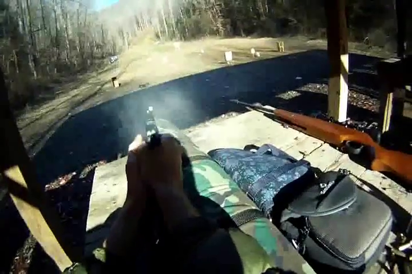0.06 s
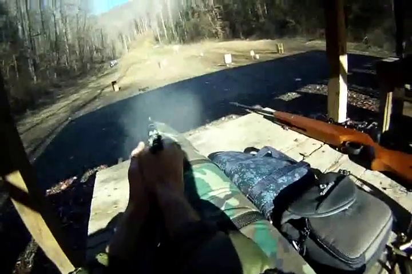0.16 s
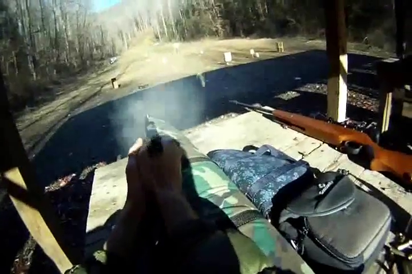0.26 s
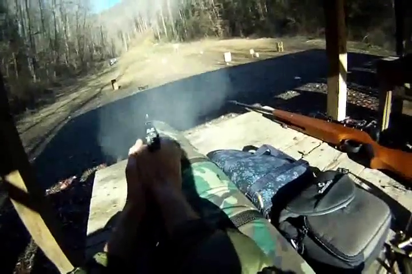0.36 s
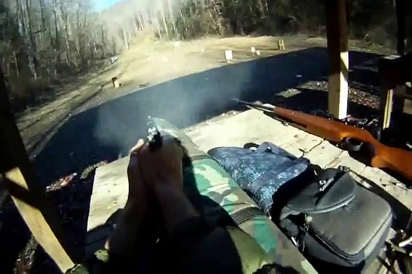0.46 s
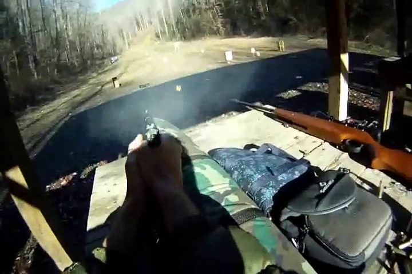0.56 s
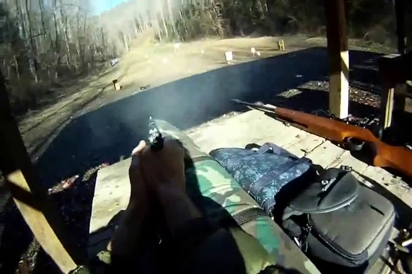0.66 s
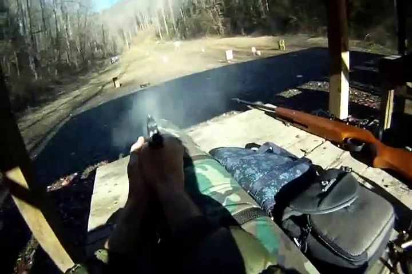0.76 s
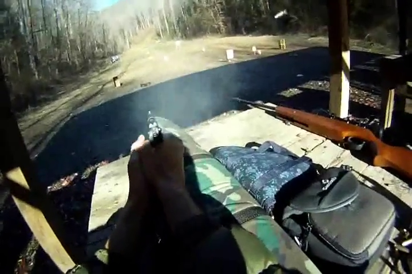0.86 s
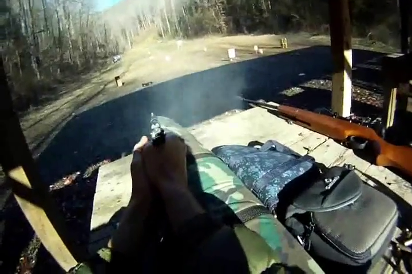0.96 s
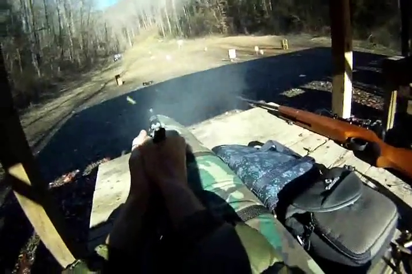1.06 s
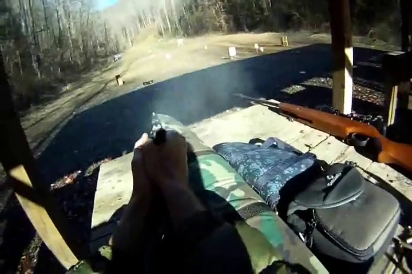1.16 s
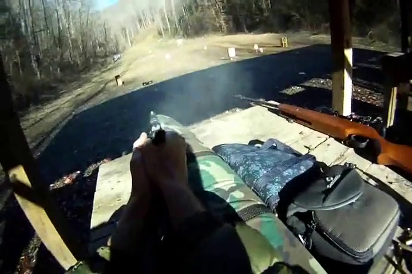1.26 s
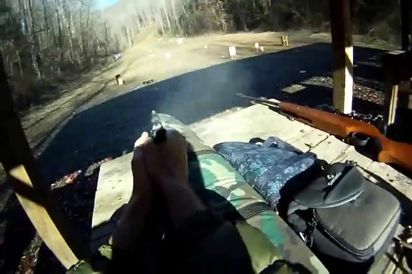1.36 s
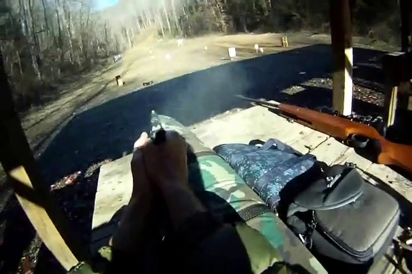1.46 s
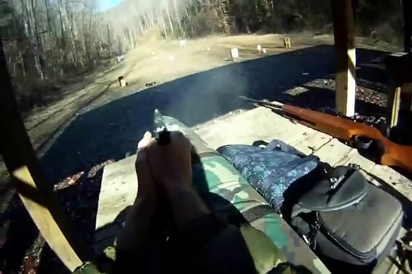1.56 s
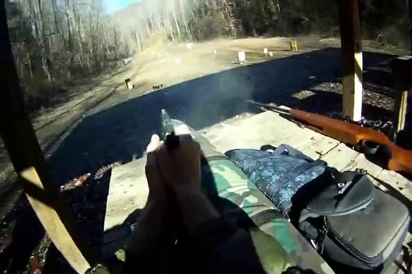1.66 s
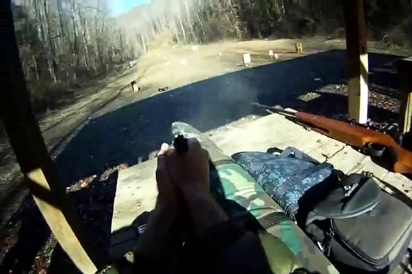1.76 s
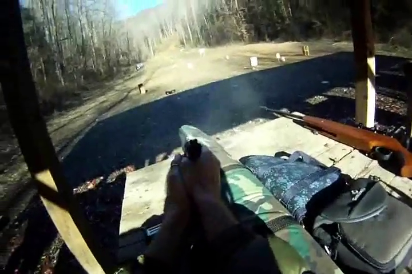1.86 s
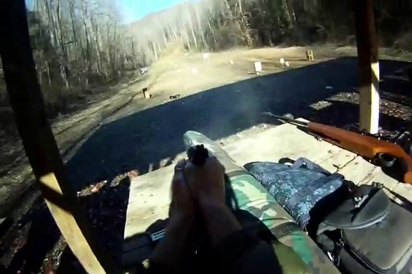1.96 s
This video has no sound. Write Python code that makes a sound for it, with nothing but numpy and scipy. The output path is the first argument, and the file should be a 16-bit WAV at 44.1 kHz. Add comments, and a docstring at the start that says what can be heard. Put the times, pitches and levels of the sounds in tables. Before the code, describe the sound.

Rapid pistol fire under a roofed outdoor range: earlier echoes already ringing, five overloaded cracks about four a second, hard slaps from roof and posts, then a long soft hillside echo. The microphone is very close.

```python
"""Two pistol shots fired before the start are still echoing, over faint wind, on a roofed outdoor range.
Five more follow, about four a second: hands rumble, the firing pin clicks, and the muzzle blast cracks.
Each blast excites the modes of a camera housing just behind the gun and overloads the camera; roof and
posts slap it back, and a wooded hillside returns a long, soft echo from diffuse scattering.
Inside the last echo come two dull, distant thuds, made of coloured noise with exponential decays."""
import sys
import numpy as np
from scipy import signal
from scipy.fft import rfft, irfft, next_fast_len
from scipy.io import wavfile
from scipy.ndimage import map_coordinates

SR = 44100
rng = np.random.default_rng(int(sys.argv[2]) if len(sys.argv) > 2 else 0)


def wav_record(signal):
    """Record a signal, one row per channel, as 16-bit PCM in the file named by sys.argv[1]."""
    frames = np.transpose(np.atleast_2d(signal))
    bounded = np.clip(frames, -1, 1)
    # unit amplitude maps onto the largest positive 16-bit level
    quanta = np.round(bounded * 32767).astype(np.int16)
    wavfile.write(sys.argv[1], SR, quanta)


N = 88200
ALIKE = 0.78  # share of the noise power that is common to all shots


def amp(db):
    """Decibels to an amplitude ratio."""
    return 10 ** (np.asarray(db) / 20)


def unit(x):
    """Normalisation to an rms of 1."""
    return x / np.sqrt(np.mean(x ** 2) + 1e-20)


def along(points, hz):
    """Spectral envelope: (Hz, value) points joined by lines on a log frequency axis."""
    corner_hz, value = np.transpose(points)
    return np.interp(np.log(hz + 1), np.log(corner_hz + 1), value)


def filtered(x, response):
    """Linear filtering: the spectrum of x times a complex response of frequency."""
    size = next_fast_len(N + SR // 2)
    spectrum = rfft(x, size) * response(np.fft.rfftfreq(size, 1 / SR))
    return irfft(spectrum, size)[..., :N]


def coloured(x, points):
    """Filtering of x by a spectral envelope in dB."""
    return filtered(x, lambda hz: amp(along(points, hz)))


def delayed(x, seconds):
    """Propagation delay: x moved later, or earlier if negative."""
    samples = round(seconds * SR)
    padded = np.pad(x, (max(samples, 0), N))
    return padded[max(-samples, 0):][:N]


def decay(t60, hold=0):
    """Exponential decay after a hold, falling 60 dB in t60 seconds."""
    falling_s = np.maximum(np.arange(N) / SR - hold, 0)
    return amp(-60 * falling_s / t60)


def swing(hz, db, centre, width):
    """Pressure pulse: a sine under a Gaussian envelope."""
    t = np.arange(N) / SR - centre
    return amp(db) * np.sin(2 * np.pi * hz * t) * np.exp(-(t / width) ** 2 / 2)


def paths():
    """Partial coherence: one white noise for each shot, mostly common to all."""
    common = rng.standard_normal(N)
    own = rng.standard_normal((len(SHOTS), N))
    return np.sqrt(ALIKE) * common + np.sqrt(1 - ALIKE) * own


def scatter(spectrum):
    """Diffuse reflection: dense noise of rms 1 with the given colour, for each shot."""
    return unit(coloured(paths(), spectrum))


def burst(t60, hold=0, size=2048, count=4):
    """Impulsive turbulence: a short noise of unit energy and nearly even spectrum for each shot."""
    shape = decay(t60, hold)[:size]
    x = paths()[:, :size] * shape
    for _ in range(count):
        # keep only the phases, then gather the flat-spectrum sound towards its start again
        flat = irfft(np.exp(1j * np.angle(rfft(x))))
        x = flat * np.sqrt(shape)
    x = x / np.linalg.norm(x, axis=1, keepdims=True)
    return np.pad(x, ((0, 0), (0, N - size)))


# Colour of the moving air. Each row: frequency in Hz, level in dB.
WIND_COLOUR = [(25, -5), (55, 4), (90, -14), (135, -11), (220, -9), (1500, -14.5), (5000, -57),
               (16000, -61.5)]
WIND_DB = -59


def wind():
    """Stationary coloured noise: faint air moving over the range."""
    return amp(WIND_DB) * unit(coloured(rng.standard_normal(N), WIND_COLOUR))


# Faint knocks far down the range. Each row: start in seconds, level in dB.
THUDS = [(1.451, -40), (1.472, -37.5)]
# Their dull colour. Each row: frequency in Hz, level in dB.
THUD_COLOUR = [(60, -6), (200, -16), (330, 1), (700, -4), (1500, -5), (4000, -27), (16000, -48)]
THUD_T60_S = 0.063


def thuds():
    """Impulsive excitation with exponential decay: dull, distant knocks inside the last echo."""
    level = sum(amp(db) * delayed(decay(THUD_T60_S), start) for start, db in THUDS)
    return level * unit(coloured(rng.standard_normal(N), THUD_COLOUR))


# Colour of the wooded slope. Each row: frequency in Hz, level in dB.
HILL_COLOUR = [(30, -10), (60, -14), (100, -18.5), (200, -18), (340, -17.5), (620, -11.5), (950, -8.5),
               (1200, -5.5), (1600, -4.5), (2350, 2), (2800, -11.5), (3050, -8.5), (3700, -6),
               (4200, -20.5), (5200, -18.5), (6000, -29.5), (7000, -19.5), (9800, -8.5), (12000, -23),
               (14300, -18), (16000, -23)]
# Swell and fall of its echo. Each row: delay after the shot in seconds, level in dB.
ECHO = [(.08, -61), (.13, -40.5), (.165, -33), (0.187, -33.5), (0.206, -27.5), (.245, -34), (.29, -35),
        (.42, -42), (.56, -47), (.82, -53.5)]
# Extra fading after the crest of the echo. Each row: frequency in Hz, loss in dB per second.
FADE = [(60, -1), (400, -6), (1200, -1.5), (2300, -1), (3500, 8.5), (5000, 8.5), (7000, 17.5), (10000, -2),
        (15000, -1)]
ECHO_T60_S = 2.15  # decay after the last row of ECHO
CLUMP_DB, CLUMP_RATE_HZ = 1.69, 140  # spread of the level in dB, new random values per second


def hillside(size=256):
    """Scattering by trunks and banks: an echo that swells, clumps and fades unevenly over frequency."""
    t = np.arange(N) / SR
    delay_s, level_db = np.transpose(ECHO)
    crest_s = delay_s[np.argmax(level_db)]
    hz, frame_s, frames = signal.stft(scatter(HILL_COLOUR), SR, nperseg=size)
    loss_db = along(FADE, hz)[:, None] * np.maximum(frame_s - crest_s, 0)
    faded = signal.istft(frames * amp(-loss_db), SR, nperseg=size)[1][:, :N]
    clumps = map_coordinates(rng.standard_normal(N), [t * CLUMP_RATE_HZ])
    swell = amp(np.interp(t, delay_s, level_db) + CLUMP_DB * clumps)
    return faded * swell * decay(ECHO_T60_S, delay_s[-1])


# Colour of sound returned by roof and posts. Each row: frequency in Hz, level in dB.
SHELTER_COLOUR = [(60, -20.5), (100, -50), (135, -9), (190, -42), (285, -10.5), (380, -29), (600, -14.5),
                  (850, -12.5), (1250, -9), (1680, -6.5), (1830, 4.5), (2300, 3.5), (2420, -8),
                  (2620, -6.5), (2850, -2.5), (3100, -6.5), (3650, -2.5), (4100, -14.5), (5100, -11),
                  (6100, -22), (7000, -14.5), (10000, -6), (12000, -31), (14200, -11.5), (16000, -18.5)]
SHELTER_DB, SHELTER_T60_S = -15.5, 0.25  # slower part of the decay
FLUTTER_DB, FLUTTER_T60_S = 4, 0.066  # louder, faster part
SHELTER_BUILD_S = 0.009


def shelter():
    """Reverberation: dense reflections under the roof build up, then decay at two rates."""
    t = np.arange(N) / SR
    slow = amp(SHELTER_DB) * decay(SHELTER_T60_S)
    fast = amp(FLUTTER_DB) * decay(FLUTTER_T60_S)
    build_up = 1 - np.exp(-(t / SHELTER_BUILD_S) ** 2)
    return scatter(SHELTER_COLOUR) * np.hypot(slow, fast) * build_up


# Lingering ring of the housing. Each row: frequency in Hz, level in dB, 60 dB decay time in seconds.
RING = [(1810, -19.5, 0.22), (1865, -50, 0.36), (1860, -18, 0.31), (2225, -26, 0.25), (2479, -30.5, 0.35)]


def lingering_ring():
    """Free vibration: lightly damped modes of the housing sound on as decaying sines."""
    t = np.arange(N) / SR
    ring = 0
    for hz, db, t60 in RING:
        ring = ring + amp(db) * decay(t60) * np.sin(2 * np.pi * (hz * t + rng.random()))
    return ring


# Slaps from roof, posts and benches. Each row: delay after the shot in seconds, level in dB.
SLAPS = [(.0097, 29.5), (0.0153, 13.5), (.0222, 4), (.0285, 5), (.043, 9.5), (.070, -3)]
SLAP_T60_S = 0.01  # of the window that shapes the burst


def slaps():
    """Early reflection: the nearest surfaces return short, separate bursts."""
    returned = 0
    for delay_s, db in SLAPS:
        returned = returned + amp(db) * np.array([delayed(b, delay_s) for b in burst(SLAP_T60_S)])
    return coloured(returned, SHELTER_COLOUR)


GRIP_DB, GRIP_CUTOFF_HZ = -43.5, 51.6
GRIP_LEAD_S, GRIP_WIDTH_S = 0.023, 0.013  # centre before the shot, Gaussian width


def grip():
    """Low-passed noise in Gaussian swells: the hands rumble as the trigger is pulled."""
    t = np.arange(N) / SR
    squeeze = sum(np.exp(-((t - start + GRIP_LEAD_S) / GRIP_WIDTH_S) ** 2 / 2) for start, *_ in SHOTS)
    rumble = filtered(rng.standard_normal(N), lambda hz: 1 / (1 + (hz / GRIP_CUTOFF_HZ) ** 4))
    return amp(GRIP_DB) * squeeze * unit(rumble)


# Resonances of the camera housing. Each row: centre in Hz, bandwidth in Hz, peak level in dB.
HOUSING = [(540, 154, -12), (914, 147, -11), (1310, 57, 2.5), (1527, 275, 2), (1860, 50, 0),
           (2294, 120, 3.5), (2640, 55, 1), (3020, 206, 0.5), (3351, 420, -4), (3798, 202, -5.5),
           (5125, 280, -10), (6780, 1400, -18.5), (9540, 1150, -9), (14020, 620, -18.5)]


def housing(f):
    """Modal superposition: damped resonances of alternating sign add up to the housing's response."""
    total = 0
    for k, (centre, width, db) in enumerate(HOUSING):
        mode = 1j * f * width / (centre ** 2 - f ** 2 + 1j * f * width)
        total = total + (-1) ** k * amp(db) * mode
    return total


STRIKER_DB, STRIKER_T60_S = 7, 0.0068  # level before the housing, window of the burst
STRIKER_LEAD_S = 0.0014


def strikers():
    """Impact: the firing pin falls just before the blast and excites the housing."""
    return amp(STRIKER_DB) * filtered(burst(STRIKER_T60_S), housing)


# Slow swings under the crack. Each row: frequency in Hz, level in dB, centre in s, Gaussian width in s.
PUSH = [(54.4, -7, 0.0044, 0.0036), (170, -49, 0.0054, 0.00067)]


def push():
    """Gas expansion: the low pressure wave of the muzzle gas."""
    return sum(swing(*row) for row in PUSH)


BLAST_DB, BLAST_HOLD_S, BLAST_T60_S = 38, 0.0045, 0.018  # level before the housing, window of the burst
SHOCK_DB = 32.5  # one-sample shock front, before the housing
BITE_HZ, BITE_WIDTH_HZ = 3180, 930  # band of the crack that differs from shot to shot
BARK_HZ, BARK_DB, BARK_CENTRE_S, BARK_WIDTH_S = 522, 0, 0.001842, 0.002
BLAST_END_S, BLAST_END_T60_S = 0.0067, 0.027  # the direct blast has passed and falls away


def blasts():
    """Forced resonance: shock front and turbulent crack drive the housing, beside the muzzle's bark."""
    *_, bark_db, bite_db = np.transpose(SHOTS)[..., None]
    shock = amp(SHOCK_DB) * (np.arange(N) == 0)
    source = amp(BLAST_DB) * burst(BLAST_T60_S, BLAST_HOLD_S) + shock

    def bitten_housing(f):
        """Spectral peaking: the housing's response with each shot's own bite."""
        return housing(f) * amp(bite_db * np.exp(-((f - BITE_HZ) / BITE_WIDTH_HZ) ** 2))

    crack = filtered(source, bitten_housing) * decay(BLAST_END_T60_S, BLAST_END_S)
    bark = amp(bark_db) * swing(BARK_HZ, BARK_DB, BARK_CENTRE_S, BARK_WIDTH_S)
    return crack + bark


# The shots. Each row: start in seconds, overall level in dB, and changes in dB of the low push,
# of the bark and of the bite of the crack.
SHOTS = [(-.262, -2.5, 0, 0, -5), (-.024, -1, 0, -3, 4), (0.2124, -0.5, 0.5, -2.5, 1),
         (0.4501, -1, 2, -4, 3), (0.6984, -1, -3.5, 0, 0), (0.9394, -1, -1, -2.5, -2.5),
         (1.1764, -0.5, 0, 0.5, 1.5)]


def scene():
    """Superposition: background and the sounds of every shot add linearly."""
    out = wind() + grip() + thuds()
    clicks = strikers()
    blast_sounds = blasts() + slaps() + lingering_ring() + shelter() + hillside()
    for (start, db, push_db, *_), blast, click in zip(SHOTS, blast_sounds, clicks):
        fired = delayed(blast + amp(push_db) * push(), start)
        struck = delayed(click, start - STRIKER_LEAD_S)
        out = out + amp(db) * (fired + struck)
    return out[None]


CLIP_DB, CLIP_HARDNESS = -1.56, 12  # ceiling, sharpness of the knee
DUCK_DB, DUCK_ATTACK_S, DUCK_RELEASE_S = 6, 0.0055, 0.2  # depth, overload time to reach it, recovery
DUCK_AT_START = 1  # fully turned down by the shot before


def gain_control(x):
    """Feed-forward compression: overload turns the gain down; it creeps back between shots."""
    overload = 1.0 * (np.abs(x[0]) > amp(CLIP_DB))
    keep = np.exp(-1 / (DUCK_RELEASE_S * SR))
    charge = signal.lfilter([1 / (DUCK_ATTACK_S * SR)], [1, -keep], overload, zi=[DUCK_AT_START])[0]
    return x * amp(-DUCK_DB * np.minimum(charge, 1))


# Response of the microphone, with a treble notch. Each row: frequency in Hz, level in dB.
MIC = [(20, 3.5), (5000, 1.5), (10500, -3), (11300, -11), (12050, -40), (12800, -12), (13800, 5),
       (15200, -0.5), (15800, -23), (16200, -32)]
TOP_HZ = 16200  # nothing passes from here up


def record(dry):
    """Saturation: gain control is too slow for the blasts, which clip; notch and band limit follow."""
    x = gain_control(dry)
    clipped = x / (1 + np.abs(x / amp(CLIP_DB)) ** CLIP_HARDNESS) ** (1 / CLIP_HARDNESS)
    return filtered(clipped, lambda hz: amp(along(MIC, hz)) * (hz < TOP_HZ))


dry = scene()
out = record(dry)
wav_record(out)
```